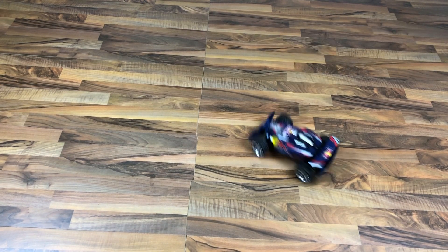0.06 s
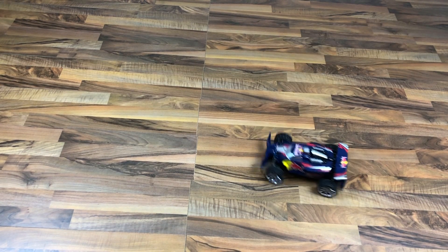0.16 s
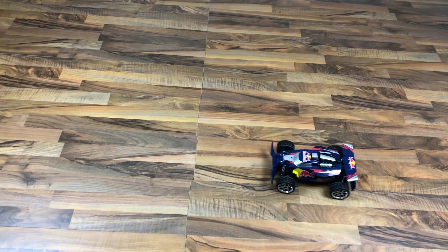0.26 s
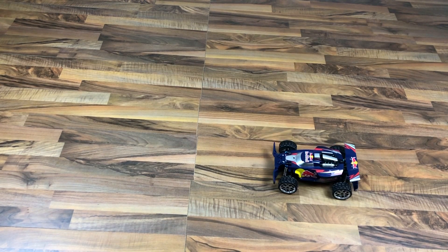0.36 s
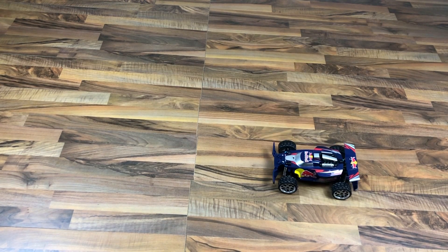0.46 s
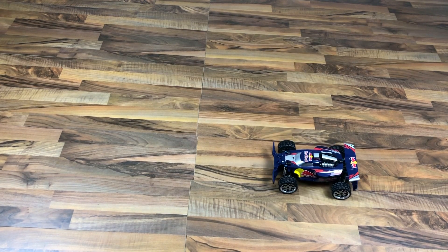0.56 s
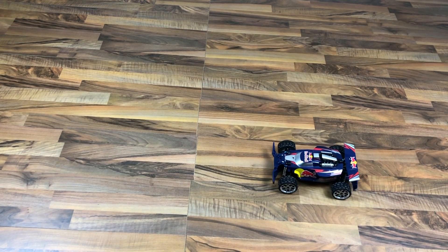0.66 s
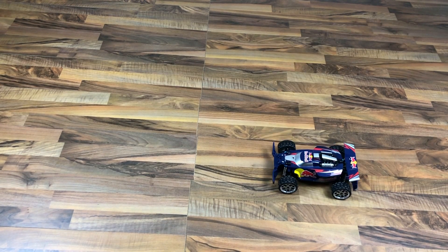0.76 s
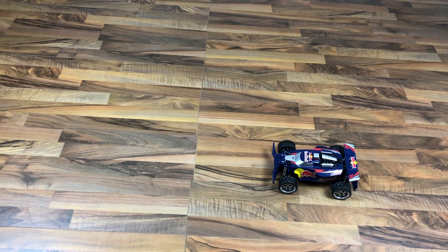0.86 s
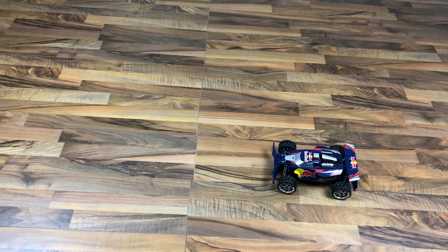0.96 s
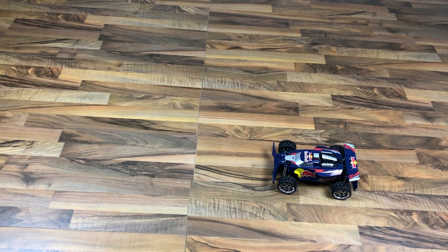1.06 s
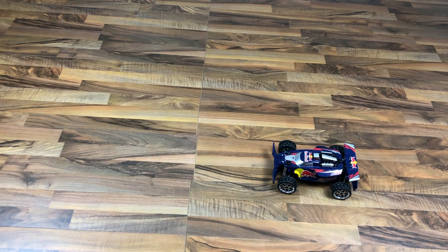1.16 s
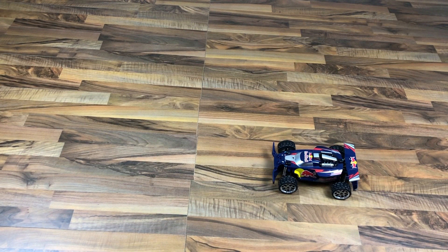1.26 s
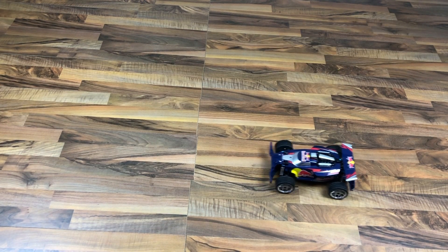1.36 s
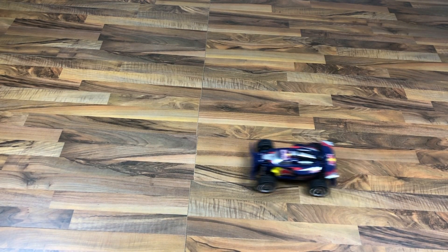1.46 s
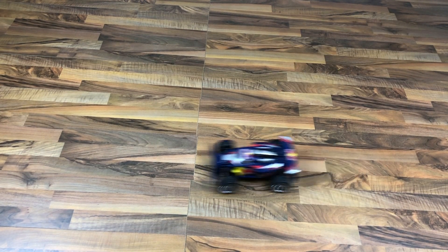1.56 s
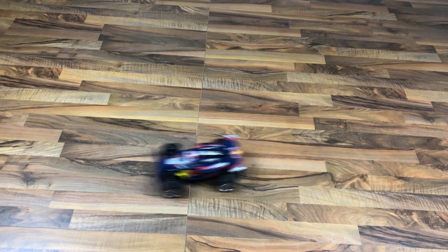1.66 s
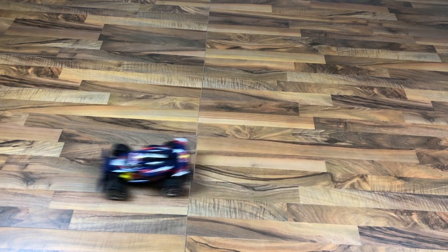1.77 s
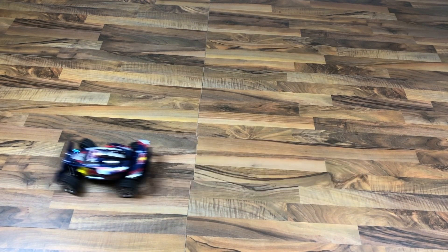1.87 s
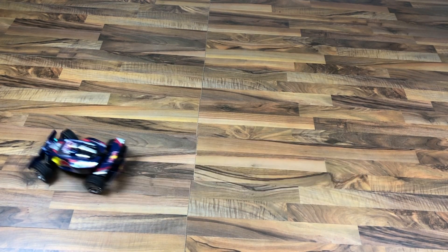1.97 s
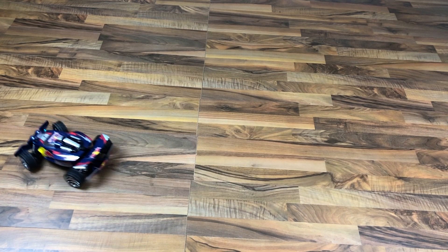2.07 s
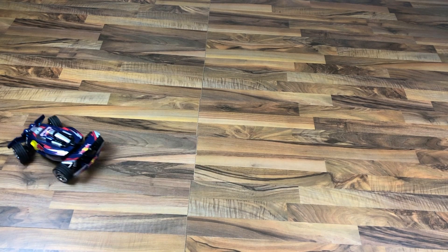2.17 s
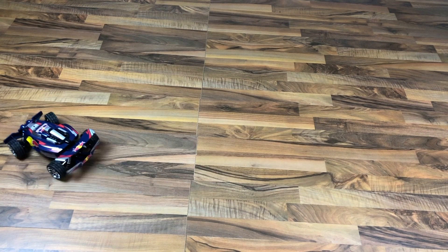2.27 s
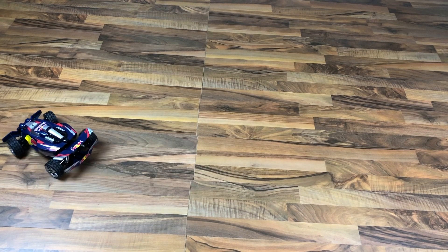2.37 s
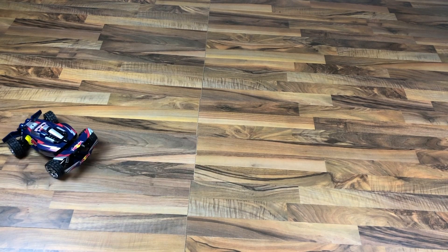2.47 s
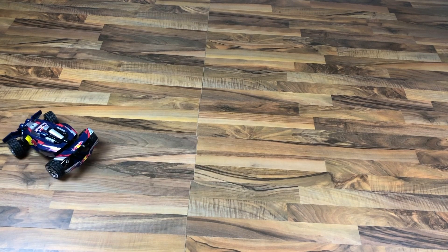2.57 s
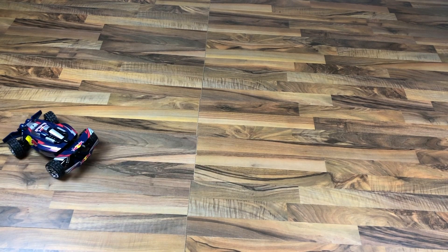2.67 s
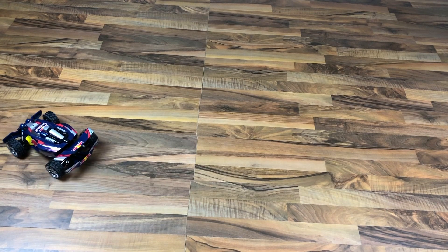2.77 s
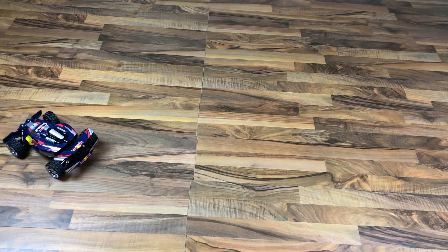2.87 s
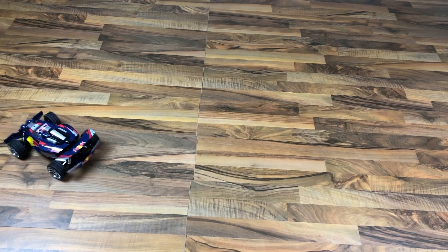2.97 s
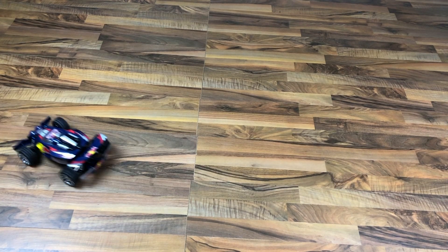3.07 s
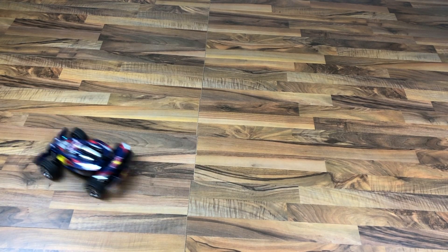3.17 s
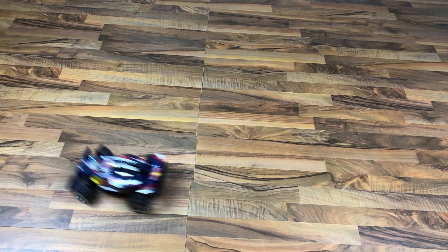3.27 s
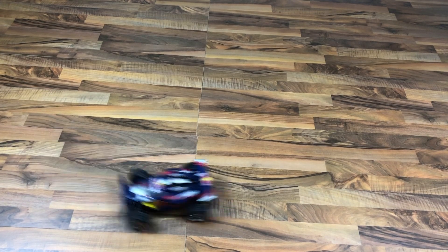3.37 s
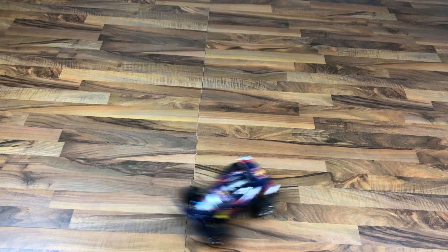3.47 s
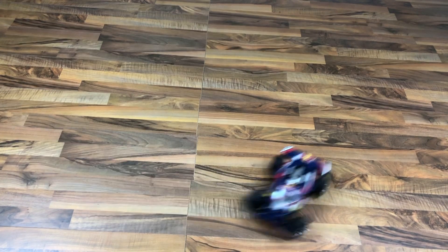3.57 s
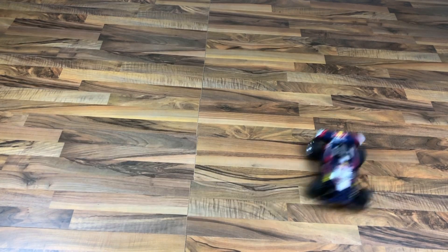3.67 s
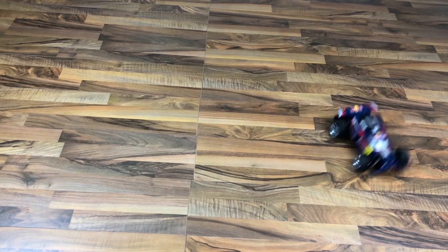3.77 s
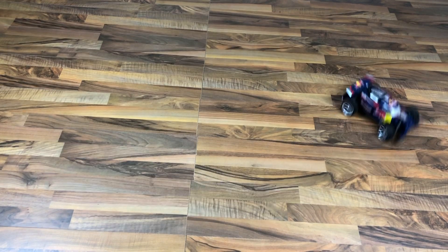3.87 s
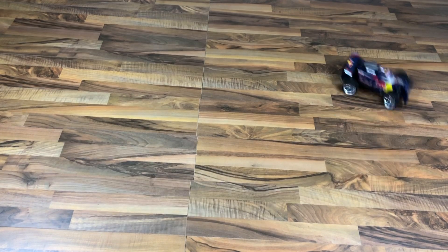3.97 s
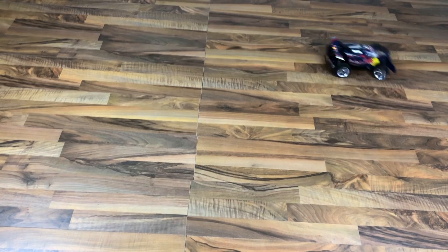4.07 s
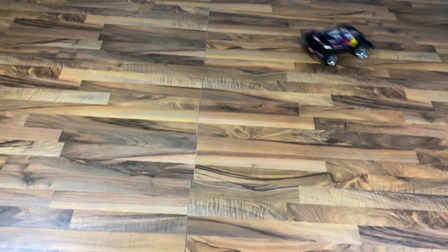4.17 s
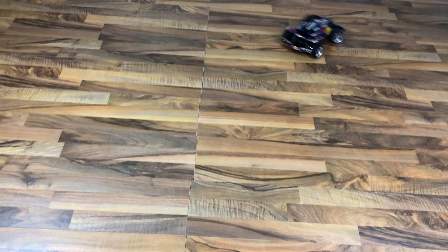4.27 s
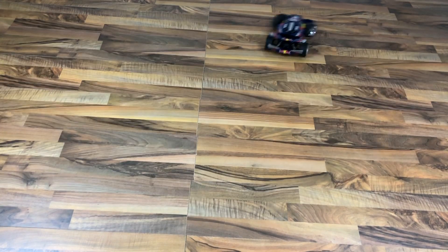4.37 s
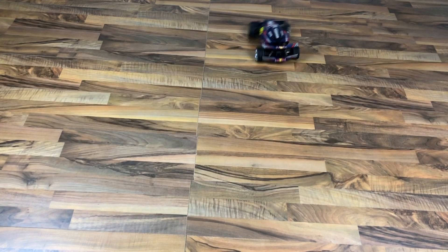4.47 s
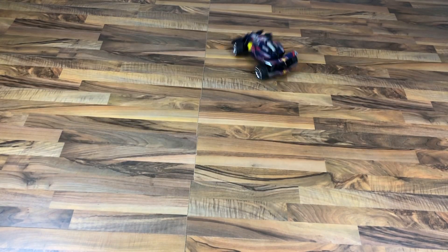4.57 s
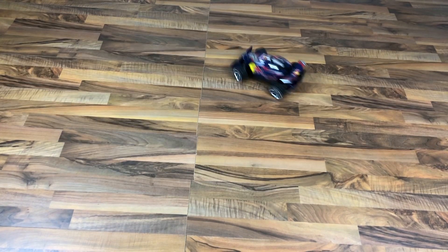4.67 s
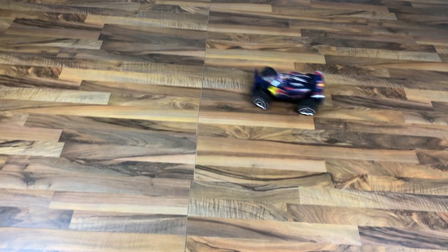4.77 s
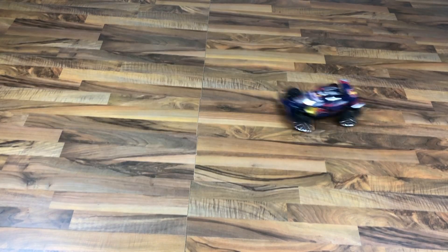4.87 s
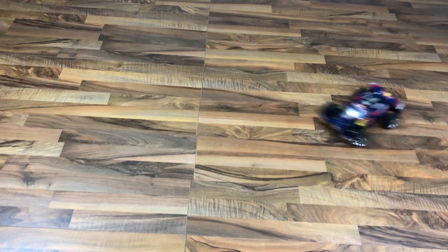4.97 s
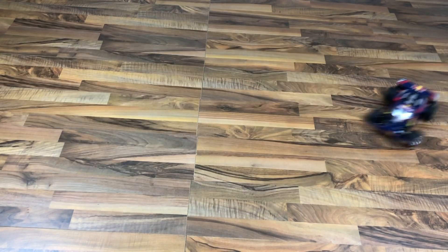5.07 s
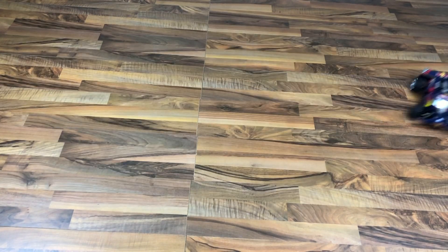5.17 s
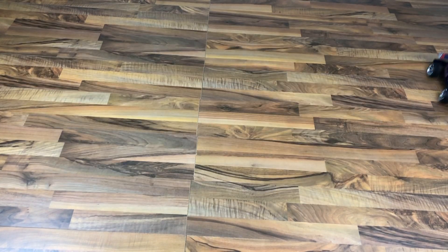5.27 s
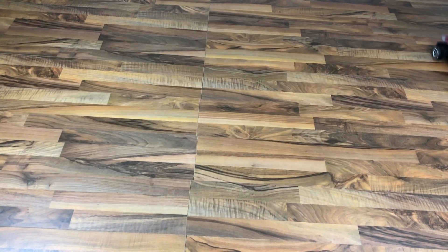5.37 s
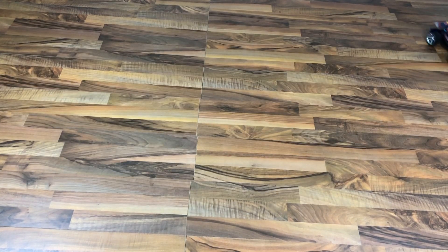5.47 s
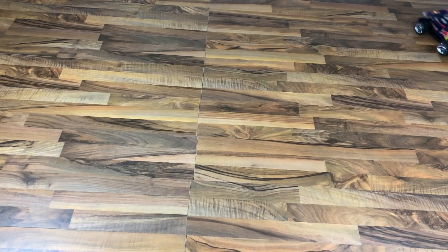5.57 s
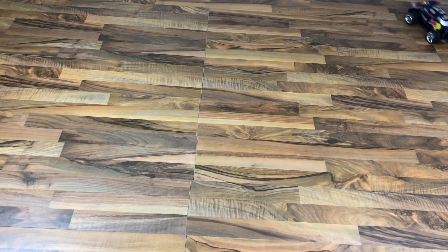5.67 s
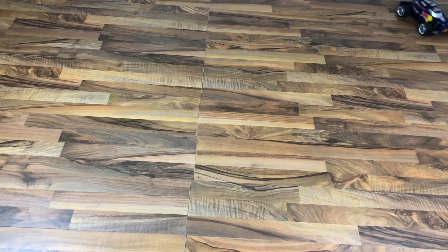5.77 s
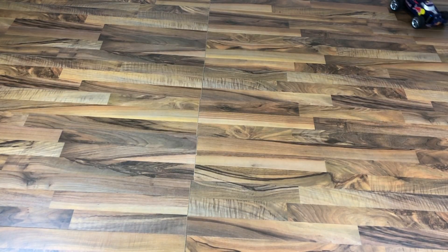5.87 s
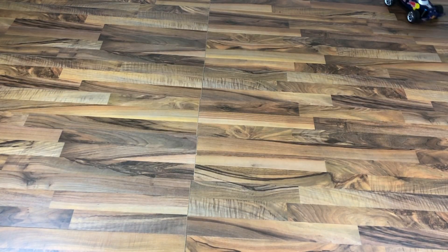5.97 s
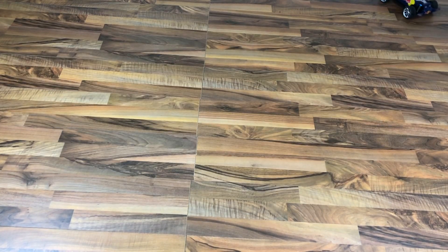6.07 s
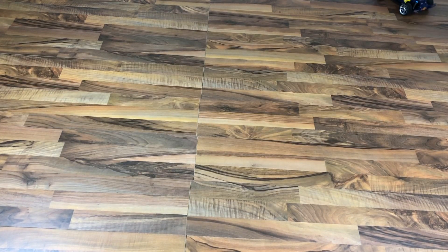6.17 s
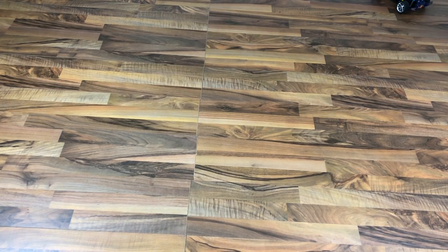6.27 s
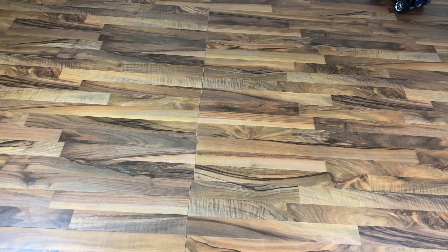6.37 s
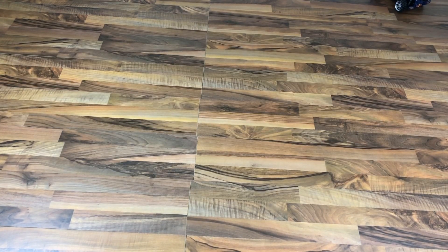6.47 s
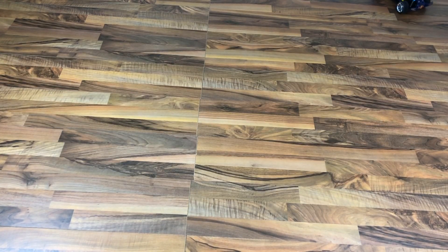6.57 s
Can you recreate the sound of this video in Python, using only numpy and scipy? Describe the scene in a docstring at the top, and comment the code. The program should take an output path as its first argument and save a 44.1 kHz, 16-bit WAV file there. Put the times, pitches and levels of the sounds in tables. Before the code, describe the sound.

A battery toy car drives on a laminate floor, heard fairly close in a small, quiet room. It opens with a brief motor whir that coasts down, ending in plastic clacks at 0.4 seconds. A near-silent pause holds tiny ticks and faint steering buzzes. At 1.4 seconds the motor whines and the gears rasp brightly in a short burst, then freewheel from 1.7 seconds, fading and dulling until the car clacks to a stop around 2.4 seconds. A few small clicks and a faint steering whir follow. At 3 seconds a clack and a whine start the longest run: a raspy plastic gear rattle with shifting resonances over a low tyre hum. The throttle cuts at about 5.3 seconds and the car coasts more softly, with two hollow knocks near 5.8 seconds and a cluster of clacks from 6.2 to 6.5 seconds as it stops.

```python
"""Toy car on laminate

A battery toy car darts about a small room, coasting to a halt between bursts of throttle.
The stalled motor whines at each start, plastic gear teeth rattle the shell, the tyre treads hum,
and the slack drive train clacks as the car stops. The steering servo whirs faintly."""
import sys
import numpy as np
from scipy import signal
from scipy.fft import rfft, irfft
from scipy.io import wavfile
from scipy.ndimage import uniform_filter1d

SR = 44100
rng = np.random.default_rng(int(sys.argv[2]) if len(sys.argv) > 2 else 0)


def master(y):
    """Save y as 16-bit WAV."""
    cut = np.clip(np.atleast_2d(y).T, -1, 1)
    pcm = np.round(cut * 32767)  # scale
    wavfile.write(sys.argv[1], SR, pcm.astype(np.int16))


N = 291942
TIME = np.arange(N) / SR
HZ = np.maximum(np.arange(N // 2 + 1) * SR / N, 1)
STALL_S, STOP_EXPONENT = .047, 12  # stall before the wheels turn; abruptness of the friction stop

# throttle bursts and run-outs: on/s, off/s, halt/s, spin-up/s, ease-off/s,
# driven rattle/dB, coasting rattle/dB, coasting fade/dB, whine/dB
THROTTLE_RUNS = [(-1, .045, .48, .1, 0.027, -31, -38.5, 18, -33),
                 (1.397, 1.68, 2.52, .07, 0.057, -24.5, -33.5, 21, -34.5),
                 (3.0, 5.345, 6.54, .2, .014, -26, -40, 7.5, -32),
                 (6.576, 7, 8, .1, .02, -32, -40, 10, -40)]
# full-throttle speed and tread scrub, set by the steering: t/s, rear tread rate/Hz, hum/dB
FULL_THROTTLE = [(0, 336, -42.5), (1.68, 350, -37.5), (1.85, 330, -41), (3.1, 300, -31.5),
                 (3.5, 315, -37.5), (3.77, 332, -37), (4.03, 309, -38.5), (4.3, 345, -47), (4.75, 345, -46),
                 (4.98, 300, -36), (5.3, 282, -38), (5.5, 280, -41)]
# play in the axle gear: t/s, knock strength/1
AXLE_PLAY = [(3.0, 0.81), (5.35, 0.52), (5.7, 2.4), (6.3, 3.6)]
# shell and gearbox resonances: f/Hz, width/Hz, lift/dB
SHELL_MODES = [(931, 67, 5.5), (1232, 160, 4.5), (1444, 210, 1.5), (1990, 280, 3.5), (4070, 260, 1),
               (5470, 190, 0), (7160, 91, 5.5), (11120, 400, 5)]
# rasps as the car pulls away: start/s, length/s, start f/Hz, level/dB
LAUNCH_RASPS = [(1.423, 0.25, 15340, -34), (3.069, .5, 10990, -35.5)]
# ringing of tyres, gearbox and floor: mid t/s, length/s, f/Hz, half-width/Hz, level/dB
STRAIN_RINGS = [(0.022, 0.18, 470.5, 150, -45.5), (1.507, 0.046, 1883, 25, -29),
                (1.588, .11, 1850, 42, -25.5), (1.593, 0.19, 9000, 220, -35), (1.639, .15, 4610, 390, -29),
                (1.688, .14, 930, 51, -34), (1.906, 0.43, 5660, 300, -41.5), (2.033, 0.15, 931, 49, -50),
                (2.779, 0.023, 996, 220, -45), (2.777, .035, 998, 270, -45.5),
                (3.142, 0.13, 10100, 510, -36), (3.27, 0.29, 7460, 510, -30.5), (3.38, .3, 5500, 580, -32),
                (3.279, 0.061, 948, 38, -34), (3.706, 0.42, 1626, 150, -34), (4.122, 0.28, 1573, 70, -32.5),
                (4.467, 0.41, 92.2, 12.9, -47.5), (4.49, 0.31, 636, 28, -44.5),
                (4.782, 0.21, 1460, 60, -34.5), (5.291, 0.11, 4150, 220, -37), (5.512, .15, 126, 6.8, -41),
                (5.68, .22, 82, 6.1, -44.5)]
# motor whine partials: multiple of the chopping rate/1, level/dB
CHOP_HARMONICS = [(1, -14.5), (2, 1.5), (3, -9.5), (4, -2), (5, -13.5), (6, -18.5), (8, -11.5)]
# knocks of slack gears and linkage: t/s, level/dB, relative treble/dB
CLACK_HITS = [(.381, -40, -10), (0.413, -26, -25), (.422, -33.5, -28), (.44, -35.5, -26),
              (0.887, -50.5, -18), (.946, -47, -20), (1.006, -40, -22), (1.157, -48.5, -32.5),
              (1.274, -46.5, -20.5), (2.357, -28, -16), (2.379, -31, -26), (2.394, -27.5, -25),
              (2.426, -30.5, -28), (2.591, -35, -35), (2.742, -54, -15), (2.769, -32.5, -18),
              (2.815, -36.5, -26.5), (2.987, -30.5, -27), (3, -24, -13.5), (5.759, -20.5, -18.5),
              (5.803, -21.5, -21), (6.236, -27, -21), (6.31, -25, -11), (6.381, -20.5, -14.5),
              (6.403, -31, -11), (6.45, -31, -13.5), (6.474, -32, -21)]
# servo moves: mid t/s, length/s, level/dB
SERVO_MOVES = [(0.578, .2, -70), (1.012, 0.2, -54.5), (1.325, 0.19, -60.5), (2.29, 0.1, -65),
               (2.799, 0.15, -53), (6.53, .14, -63)]
# spectra of loaded gears, free gears, clacks, floor rumble, servo and air: f/Hz, level/dB
DRIVE_SPECTRUM = [(240, -32), (400, -5.5), (520, -12.5), (719, -9), (893, -2), (1230, -8.5), (1440, -2.5),
                  (1630, -0.5), (2220, -6), (4050, -5.5), (5350, -4.5), (7990, -12.5), (11000, -14.5),
                  (13900, -12.5), (16000, -24)]
COAST_SPECTRUM = [(240, -31.5), (400, -13), (588, -7.5), (949, -0.5), (1060, -2.5), (1230, -1), (1600, 0.5),
                  (1960, 1), (2290, -6), (2590, -5), (5430, -1), (7400, -5.5), (9470, -3.5), (11400, -3.5),
                  (16000, -7.5)]
CLACK_SPECTRUM = [(120, -21), (200, -13), (427, -20.5), (912, -4), (1910, -2.5), (2420, -11), (3410, -6.5),
                  (6900, -4.5), (8720, -1.5), (11200, 2), (15000, -8.5)]
RUMBLE_SPECTRUM = [(25, -25.5), (45, -6), (85, 2), (150, 1), (300, 7.5), (500, -3), (900, -15), (1600, -36)]
SERVO_SPECTRUM = [(120, -48), (200, -14.5), (561, -2), (732, -5), (956, -6), (1600, -13), (2020, -9),
                  (3320, -17.5), (4910, -14.5), (10200, -15), (14000, -18.5)]
AIR_SPECTRUM = [(18, -45), (30, 2.5), (85, 1), (131, -4.5), (182, -4), (253, -9.5), (303, -8),
                (1580, -22.5), (2560, -24.5), (13000, -31)]


def gearbox(tread_hz):
    """Loaded teeth rasp; unloaded ones are softer and ring the shell differently."""
    rattle = loose_panels(gear_rattle(tread_hz))
    loaded = radiate(rattle, driven(), DRIVE_SPECTRUM)
    unloaded = radiate(rattle, coasting(), COAST_SPECTRUM)
    return from_db(-1.83) * loaded + from_db(-2) * unloaded


def gear_rattle(tread_hz, teeth_per_block=4.8, knocks_per_block=.32, scatter_db=1.5, knock_s=.0056):
    """Teeth strike, chatter and rub; the slack axle gear knocks once a turn. Levelled to unit power."""
    mesh_hz = tread_hz + 40  # keeps chattering at a stall
    strikes = ticks(teeth_per_block * mesh_hz * (1 + .06 * drift(150))) * np.sqrt(mesh_hz)
    strikes *= from_db(scatter_db * np.clip(white(), -2, 2))
    clicks = rms_one(strikes * rng.choice([1, 1, -1], N))
    chatter = rms_one(die_away(strikes, .0007) * white())
    rub = white()
    knocks = ticks(knocks_per_block * tread_hz * (1 + .3 * drift(30))) * rng.uniform(0, 1, N) ** 2
    bursts = 1 + in_time(AXLE_PLAY)[0] * die_away(knocks, knock_s)
    rattle = (clicks + 1.36 * chatter + .55 * rub) * bursts
    return rattle / np.sqrt(uniform_filter1d(rattle ** 2, SR // 12) + 1e-9)


def loose_panels(rattle, depth_db=2, rate_hz=12):
    """Panels of the loose shell speak up in turn: each band's level drifts."""
    spectrum, out = rfft(rattle), 0
    edges_hz = [0, *np.geomspace(1100, 14000, 40), SR]
    for low, high in zip(edges_hz, edges_hz[1:]):
        panel = irfft(spectrum * ((HZ >= low) & (HZ < high)), N)
        out += panel * from_db(depth_db * drift(rate_hz))
    return out


def radiate(rattle, envelopes, spectrum, loud_db=-25.5):
    """The shell colours the rattle; its boom stands out when the rattle is soft."""
    shell = colour(rattle, spectrum, SHELL_MODES)
    boom = band(shell, 1, 2400) / np.std(band(shell, 1020, 1900))
    core = rms_one(band(shell, 2400, 7700))
    treble = rms_one(band(shell, 7700, SR))
    out = 0
    for opened, db, treble_db in envelopes:
        boom_db = -8 + .24 * (loud_db - db)
        out += opened * from_db(db) * (core + from_db(boom_db) * boom + from_db(treble_db) * treble)
    return out


def motion(on, off, halt, spin_s, drag=1.65):
    """Stall, spin-up, drag, friction stop. Returns shares of full speed and of run-out elapsed."""
    spent = np.clip((TIME - off) / (halt - off), 0, 1)
    spun_up = 1 - np.exp(-np.clip(TIME - on - STALL_S, 0, off - on) / spin_s)
    return spun_up * np.exp(-drag * spent) * (1 - spent ** STOP_EXPONENT), spent


def driven(speed_exponent=.98, stall_pace=.094, launch_s=.15):
    """Loaded rattle grows with speed, brightest at launch. Yields gate, level/dB, treble/dB."""
    for on, off, halt, spin_s, ease_s, drive_db, *_ in THROTTLE_RUNS:
        pace, _ = motion(on, off, halt, spin_s)
        rolling_s = TIME - on - STALL_S
        launch = (rolling_s > 0) * np.exp(-np.abs(rolling_s) / launch_s)
        db = drive_db + speed_exponent * 20 * np.log10(np.maximum(pace, stall_pace))
        yield gate(on, off, fall_s=ease_s), db, -2 + 5 * launch


def coasting(dulling_db=8):
    """Free rattle takes over, then fades and dulls to the halt. Yields gate, level/dB, treble/dB."""
    for on, off, halt, spin_s, ease_s, _, coast_db, fade_db, _ in THROTTLE_RUNS:
        _, spent = motion(on, off, halt, spin_s)
        free = (TIME > off) * (1 - gate(on, off, fall_s=ease_s)) * (1 - spent ** STOP_EXPONENT)
        late = spent ** 1.5
        yield free, coast_db - fade_db * late, -1.5 - dulling_db * late


def launch_rasp(end_hz=3674, half_width_hz=SR / 40):
    """A bright band swells and glides down as the car pulls away."""
    out = 0
    for start_s, length_s, start_hz, db in LAUNCH_RASPS:
        glide_hz = start_hz * (end_hz / start_hz) ** np.clip((TIME - start_s) / length_s, 0, 1)
        gain = from_db(db) * swell(start_s + length_s / 2, length_s)
        out += gain * narrow_noise(glide_hz, half_width_hz)
    return out


def freewheel(hz=7330, half_width_hz=610, relative_db=-7.5):
    """Unloaded gears sing in one high band through each run-out."""
    gain = 0
    for (_, off, halt, *_), (_, coast_db, _) in zip(THROTTLE_RUNS, coasting()):
        gain += swell((off + halt) / 2, halt - off) * from_db(coast_db + relative_db)
    return gain * narrow_noise(hz, half_width_hz)


def strain_ringing():
    """Random contact rings tyres, gearbox and floor as the car strains and turns."""
    return sum(swell(mid_s, length_s) * from_db(db) * narrow_noise(hz, half_width_hz)
               for mid_s, length_s, hz, half_width_hz, db in STRAIN_RINGS)


def motor_whine(chop_hz=488, peak_s=.023, flutter_db=3.5, wobble_rad=.26):
    """Controller pulses make the stalled windings sing; the brushes roughen the tone."""
    phase = 2 * np.pi * chop_hz * TIME + wobble_rad * drift(45)
    gain = tone = 0
    for on, *_, whine_db in THROTTLE_RUNS:
        age = np.clip((TIME - on) / peak_s, 0, 40)
        gain += from_db(whine_db) * age * np.exp(1 - age)
    for k, db in CHOP_HARMONICS:
        level = from_db(db - 1.5 + flutter_db * drift(66))
        tone += level * np.sin(k * phase + rng.uniform(0, 2 * np.pi))
    return gain * tone


def clacks(crack_s=.005, ring_s=.017, body_db=-5, split_hz=7700):
    """Plastic parts knock together: a short crack, then the hollow shell rings out."""
    hit_s, db, treble_db = np.transpose(CLACK_HITS)
    grain, out = white(), 0
    for level_db, low_hz, high_hz in ((db + body_db, 1, split_hz), (db + treble_db, split_hz, SR)):
        hits = np.zeros(N)
        hits[(hit_s * SR).astype(int)] = from_db(level_db)
        envelope = die_away(hits, crack_s) + .36 * die_away(hits, ring_s)
        out += band(colour(grain * envelope, CLACK_SPECTRUM, SHELL_MODES), low_hz, high_hz)
    return out


def tyres(tread_hz, pace, hum_db, front_ratio=.58, waver_hz=13, rumble_db=-45, speed_exponent=1.66):
    """Treads hum at their block rates, floor grain passes at road speed, the boards rumble."""
    rear, front = (narrow_noise(hz, waver_hz) + .8 * np.sin(2 * np.pi * turns(hz))
                   for hz in (tread_hz, front_ratio * tread_hz))
    throttle = sum(gate(on, off) for on, off, *_ in THROTTLE_RUNS)
    rear_load = np.clip(uniform_filter1d(throttle, SR // 8), 0, 1)  # weight shifts back under power
    rear *= from_db(5 * drift(5.3))
    rear += from_db(-11) * narrow_noise(2 * tread_hz, waver_hz)
    rear *= from_db(-7 * (1 - rear_load))
    front *= from_db(2 - 10.9 * rear_load + 3.1 * drift(6))
    floor = rms_one(band(white(), 210, 385))
    grain = np.interp(turns(tread_hz), TIME * 300, floor)  # unshifted at a 300 Hz tread rate
    contact = band(rear + front + from_db(-2) * grain, 68, 900)
    hum = from_db(hum_db) * contact / np.sqrt(uniform_filter1d(contact ** 2, SR // 10) + 1e-6)
    rumble = from_db(rumble_db) * colour(white(), RUMBLE_SPECTRUM)
    return pace ** speed_exponent * (hum + rumble)


def servo_buzz(tooth_hz=420):
    """Tiny gears buzz as the front wheels swing."""
    strikes = ticks(tooth_hz * (1 + .27 * drift(25)))
    teeth = rms_one(die_away(strikes, .0006))
    buzz = colour((1 + .7 * teeth) * white(), SERVO_SPECTRUM, SHELL_MODES)
    gain = sum(from_db(db) * swell(mid_s, length_s) ** 2.2 for mid_s, length_s, db in SERVO_MOVES)
    return gain * rms_one(buzz)


def servo_whistle(hz=15690, half_width_hz=45, level_db=-53):
    """The steering drive sings at the edge of hearing while it moves."""
    powered = sum(swell(mid_s, length_s) for mid_s, length_s, _ in SERVO_MOVES)
    tone = np.sin(2 * np.pi * hz * TIME) + .68 * narrow_noise(hz, half_width_hz)
    return from_db(level_db) * powered * tone


def room(x, t60_s=.45, treble_t60_ratio=.47, delay_s=.006, wet_db=-10.5):
    """Direct sound plus diffuse wall reflections; the treble dies sooner."""
    noise = white() * (TIME > delay_s)
    dull = band(noise, .95, 4500)
    decay_db = -60 * TIME / t60_s
    tail = dull * from_db(decay_db) + (noise - dull) * from_db(decay_db / treble_t60_ratio)
    return x + from_db(wet_db) * signal.fftconvolve(x, tail[:SR] / np.linalg.norm(tail))[:N]


def room_air(level_db=-64):
    """Faint, steady, bass-heavy noise."""
    return from_db(level_db) * colour(white(), AIR_SPECTRUM)


def from_db(db):
    """Decibels to gain."""
    return 10 ** (np.asarray(db) / 20)


def rms_one(x):
    """Scale to unit power."""
    return x / np.sqrt(np.mean(x ** 2) + 1e-20)


def white():
    """Unit white noise."""
    return rng.standard_normal(N)


def in_time(rows):
    """Each column of a time curve, per sample."""
    t_s, *columns = np.transpose(rows)
    return [np.interp(TIME, t_s, column) for column in columns]


def gate(start_s, end_s, rise_s=.0011, fall_s=.016):
    """Open between two times, exponential outside."""
    outside = np.maximum(start_s - TIME, 0) / rise_s + np.maximum(TIME - end_s, 0) / fall_s
    return np.exp(-np.minimum(outside, 40))


def swell(mid_s, length_s):
    """Half-sine rise and fall."""
    return np.sin(np.pi * np.clip((TIME - mid_s) / length_s + .5, 0, 1))


def turns(hz):
    """Cycles completed at a changing rate."""
    return np.cumsum(hz) / SR


def ticks(hz):
    """A unit click per cycle."""
    return np.diff(np.floor(turns(hz)), prepend=0)


def die_away(clicks, decay_s):
    """An exponential tail on each click."""
    return signal.lfilter([1], [1, -np.exp(-1 / (decay_s * SR))], clicks + 1e-18)


def drift(rate_hz):
    """Low-passed noise of unit spread."""
    lowpass = signal.butter(2, rate_hz, fs=SR / 16, output="sos")
    slow = signal.sosfilt(lowpass, rng.standard_normal(N // 16 + 2002))[2000:]
    return np.interp(np.arange(N) / 16, np.arange(len(slow)), rms_one(slow))


def narrow_noise(hz, half_width_hz):
    """A randomly driven resonance, steady or gliding."""
    phase = 2 * np.pi * turns(np.broadcast_to(hz, N))
    return drift(half_width_hz) * np.cos(phase) + drift(half_width_hz) * np.sin(phase)


def colour(x, spectrum, modes=()):
    """Minimum-phase filter of unit power gain: broad spectrum plus resonances."""
    hz, db = np.transpose(spectrum)
    db = np.interp(np.log(HZ), np.log(hz), db)
    db += sum(lift / (1 + (2 * (HZ - f) / width) ** 2) for f, width, lift in modes)
    cepstrum = irfft(np.log(rms_one(from_db(db))), N)
    cepstrum[1:N // 2] *= 2
    cepstrum[N // 2 + 1:] = 0
    return irfft(rfft(x) * np.exp(rfft(cepstrum)), N)


def band(x, low_hz, high_hz):
    """Zero-phase band-pass."""
    return irfft(rfft(x) / (1 + (low_hz / HZ) ** 12) / (1 + (HZ / high_hz) ** 12), N)


def scene():
    """The car in its room over quiet air; mono on two channels."""
    full_tread_hz, hum_db = in_time(FULL_THROTTLE)
    pace = sum(motion(on, off, halt, spin_s)[0] for on, off, halt, spin_s, *_ in THROTTLE_RUNS)
    tread_hz = full_tread_hz * pace
    drive = gearbox(tread_hz) + launch_rasp() + freewheel() + strain_ringing() + motor_whine()
    car = drive + servo_buzz() + servo_whistle() + clacks()
    air = room_air()
    return np.tile(room(car) + tyres(tread_hz, pace, hum_db) + air, (2, 1))


def record(dry):
    """Microphone bass roll-off at 32 Hz; steep cut at 16 kHz."""
    dry = signal.sosfilt(signal.butter(4, 32, "high", fs=SR, output="sos"), dry)
    return signal.sosfilt(signal.ellip(12, .1, 90, 16000, fs=SR, output="sos"), dry)


dry = scene()
out = record(dry)
master(out)
```